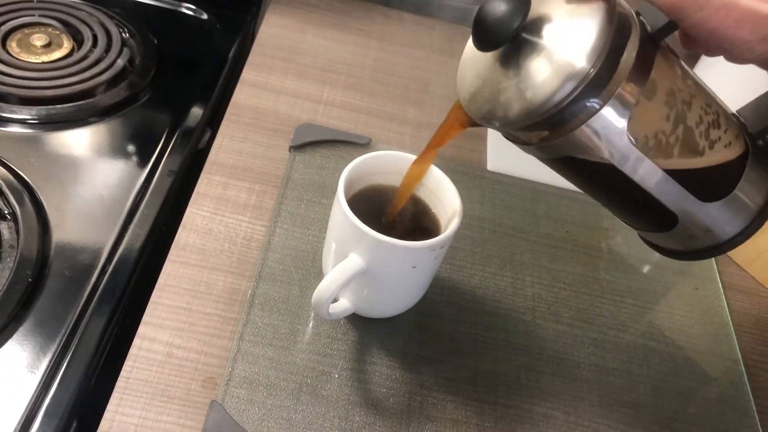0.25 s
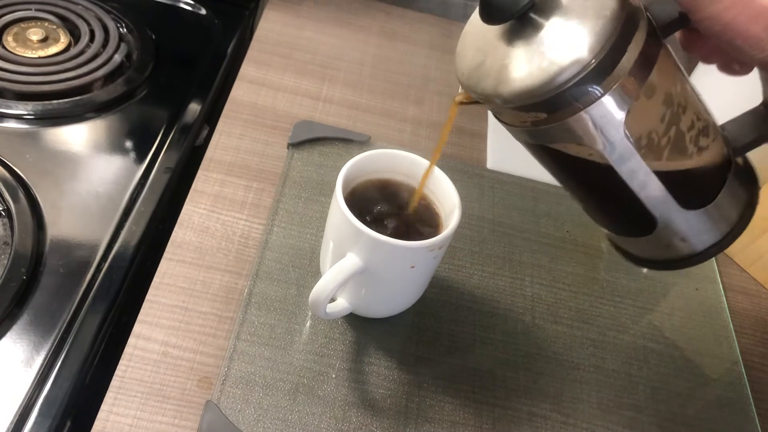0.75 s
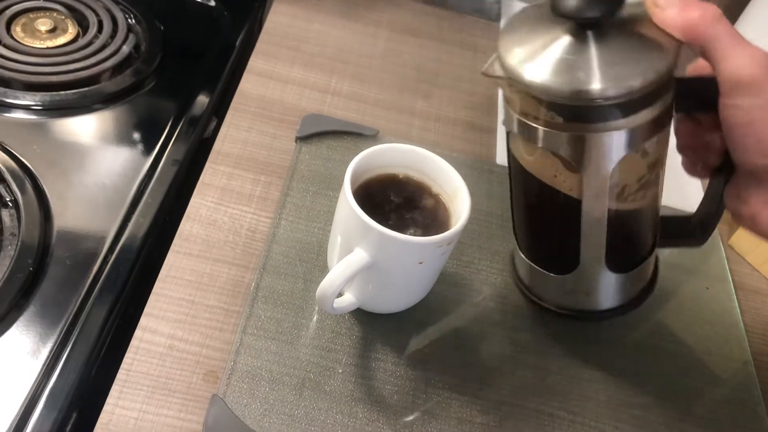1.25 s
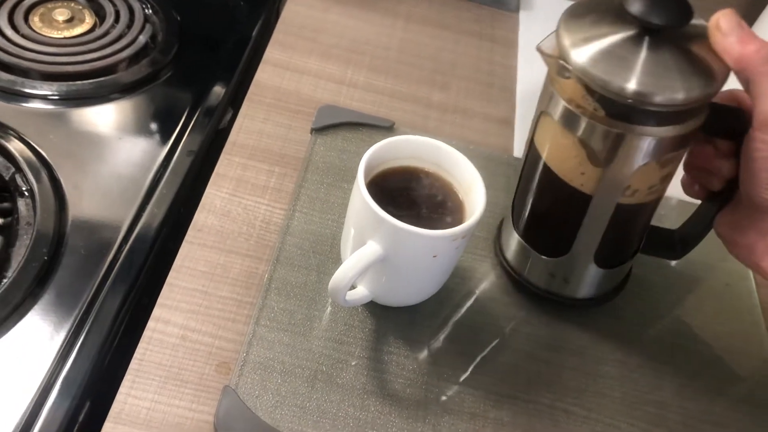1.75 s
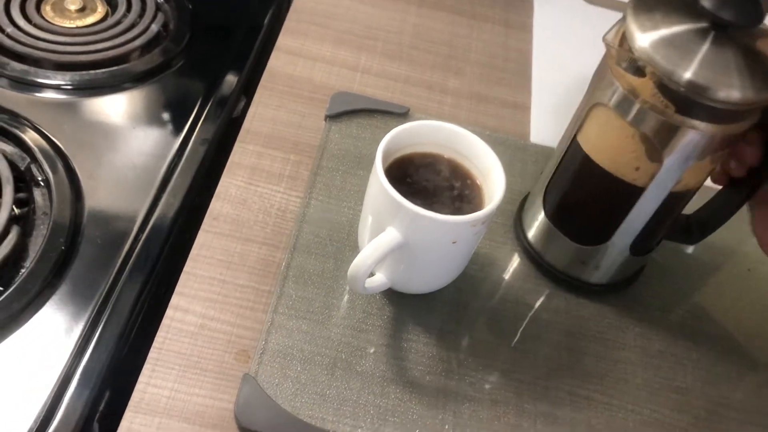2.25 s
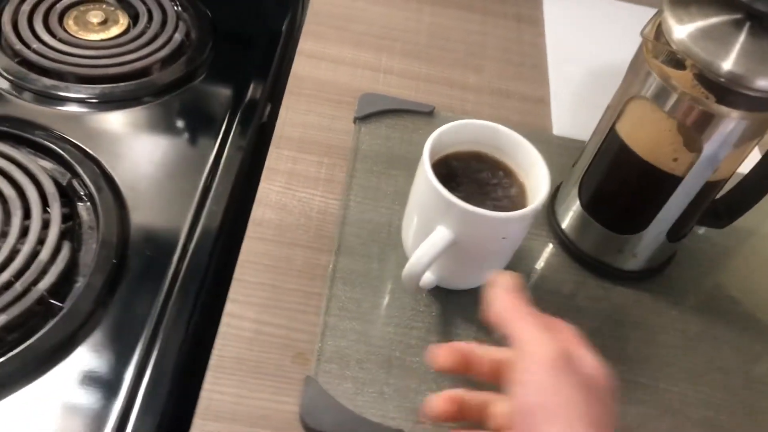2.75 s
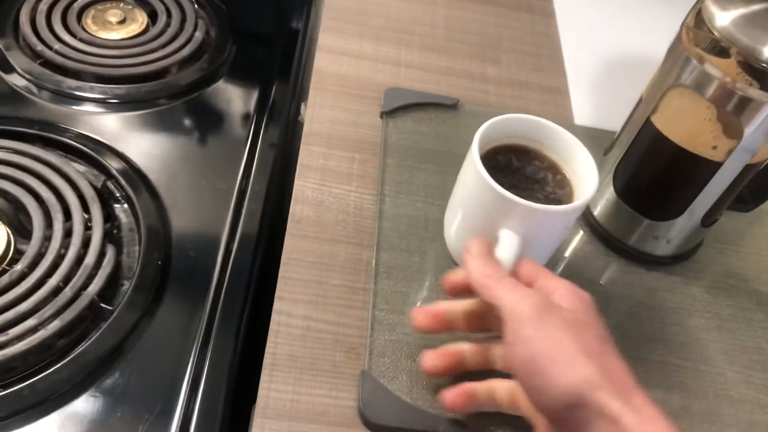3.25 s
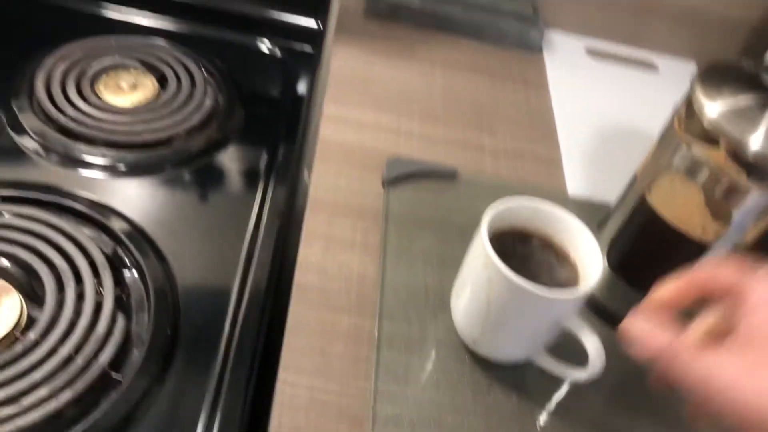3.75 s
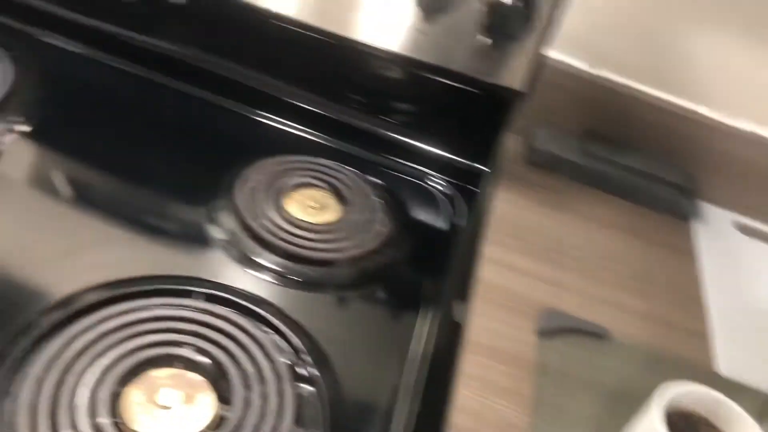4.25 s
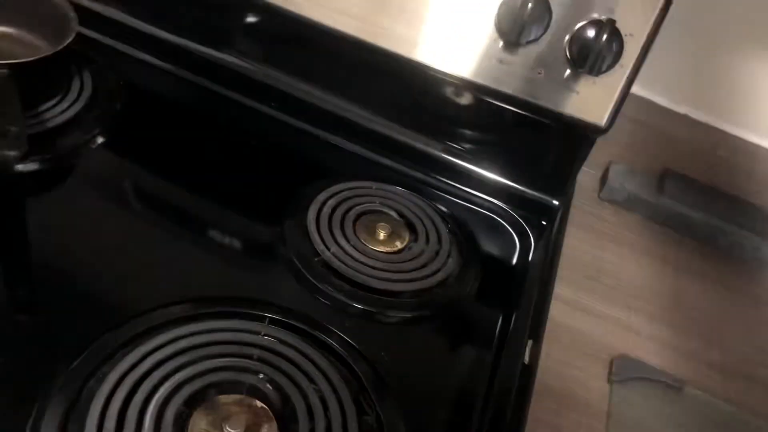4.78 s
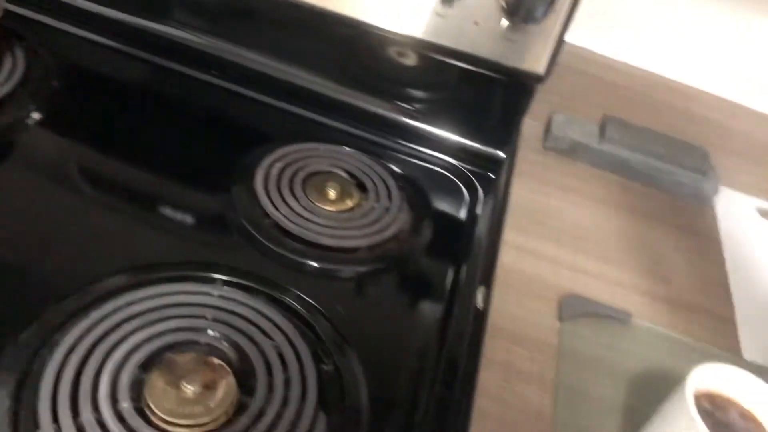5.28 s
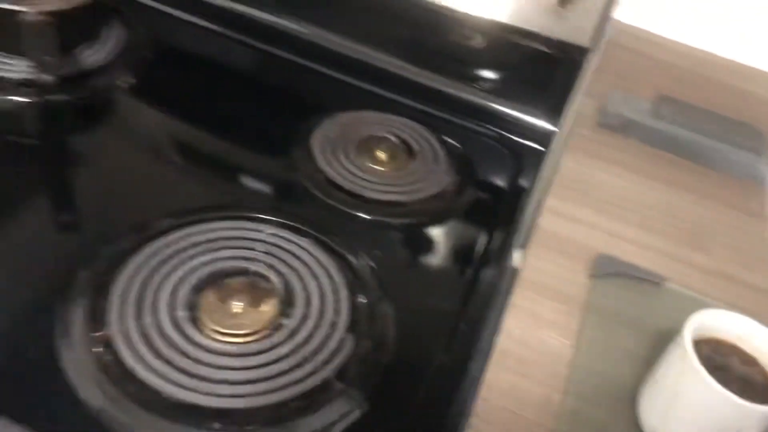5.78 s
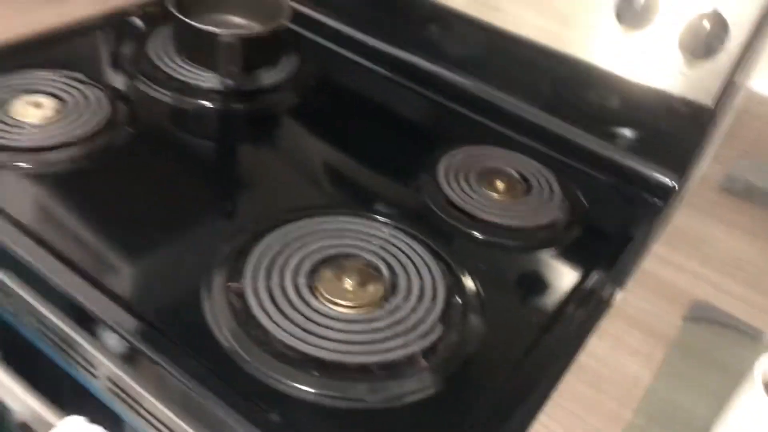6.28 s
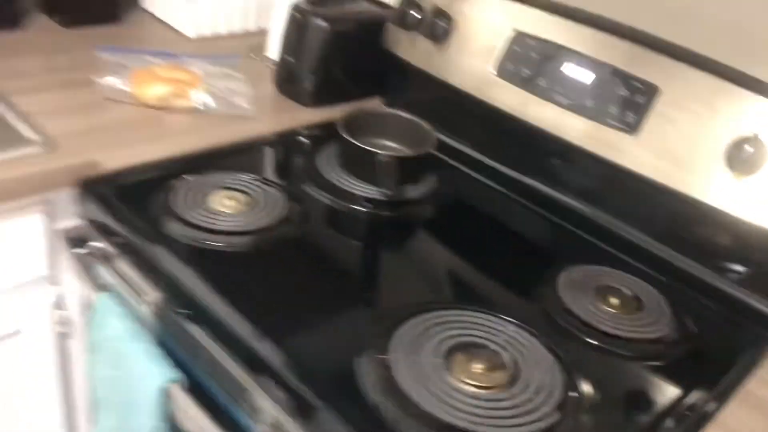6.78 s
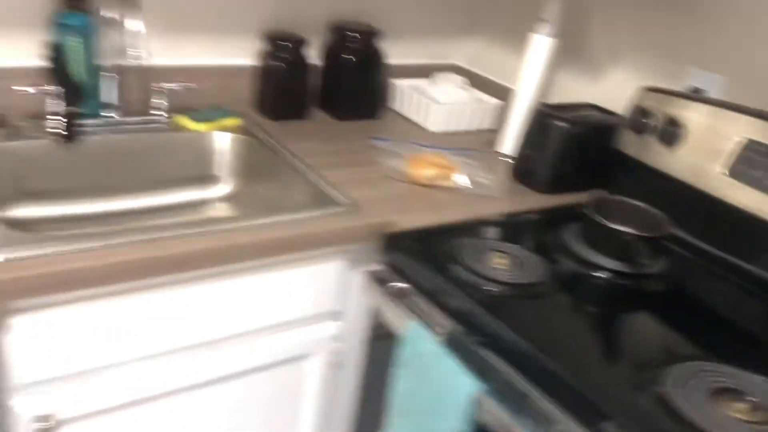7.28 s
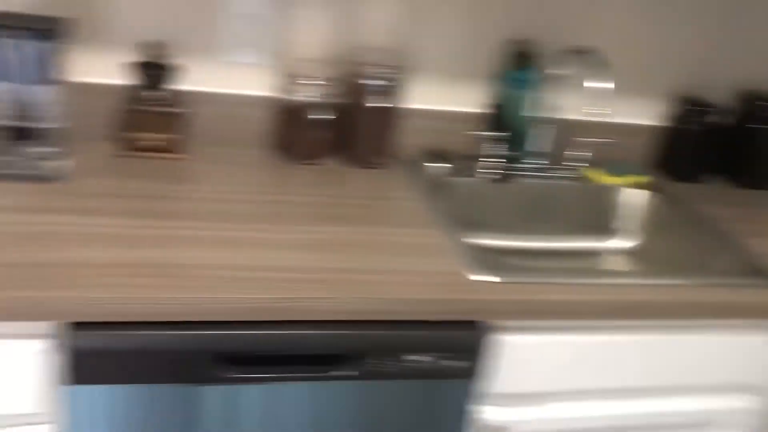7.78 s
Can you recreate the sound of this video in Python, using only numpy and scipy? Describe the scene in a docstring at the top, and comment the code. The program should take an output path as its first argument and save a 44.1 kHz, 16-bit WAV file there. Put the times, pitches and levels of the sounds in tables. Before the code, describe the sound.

In a small kitchen, the last of a coffee pour plops and spatters into a ceramic mug. The pot clunks down on a glass board and knocks a few more times, and the mug scrapes faintly as it is turned. A light switch snaps with a brief metallic ring. Soft steps, rustling clothes and a double knock like a cupboard door follow, all heard from close by over a low hum.

```python
"""Coffee plops and spatters into a ceramic mug: the last of a pour, its bubbles ringing the air inside.
The pot knocks down on a glass board, the mug grates as it is turned, and a light switch snaps off,
ringing a sheet metal hood. Someone steps away with a double knock and a rustle of clothes.
Faint drips, each one ringing bubble, and a low mains hum fill the small kitchen."""
import sys
import numpy as np
from scipy import signal
from scipy.fft import rfft, irfft
from scipy.io import wavfile

SR = 44100
rng = np.random.default_rng(int(sys.argv[2]) if len(sys.argv) > 2 else 0)


def wrap_up_sound(samples):
    """Save the sound to the file named by the first command line argument, as 16-bit audio."""
    columns = np.atleast_2d(samples).T
    # keep every value between -1 and 1, then stretch to whole-number steps
    tamed = np.clip(columns, -1, 1)
    steps = np.round(tamed * 32767).astype(np.int16)
    wavfile.write(sys.argv[1], SR, steps)


N = 354123
TIME_S = np.arange(N) / SR
CUTOFF_HZ = 16150
BLOW_SAMPLES = SR // 100  # a blow's level is its rms as if packed into this span
EDGES_HZ = np.geomspace(22, 17500, 30)
CENTRES_HZ, WIDTHS_HZ = np.sqrt(EDGES_HZ[1:] * EDGES_HZ[:-1]), np.diff(EDGES_HZ)
BANK = [signal.butter(2, pair, "band", fs=SR, output="sos") for pair in zip(EDGES_HZ, EDGES_HZ[1:])]

# Mains hum. Each row: frequency in Hz, rms level in dB.
HUM_PARTIALS = [(120, -62), (240, -79.5)]
# Kitchen reverberation. Each row: frequency in Hz, t60 in seconds.
ROOM_DECAY = [(80, 0.5), (250, 0.42), (700, 0.79), (1800, 0.52), (4800, 0.56), (9000, 0.17), (15000, 0.53)]

# Noise spectra. Each row: frequency in Hz, relative level in dB.
RUMBLE_SPECTRUM = [(25, -36), (55, -10), (90, -15.5), (150, -13.5), (230, -16), (300, -21.5), (420, -19),
                   (550, -24.5), (1300, -29.5), (2500, -35.5), (4600, -37.5), (9000, -44), (16000, -44)]
ROOM_SPECTRUM = [(60, -4), (300, 3), (1000, 0.5), (2500, -3.5), (6000, -0.5), (16000, -7)]
RUSTLE_SPECTRUM = [(150, 0), (500, 11.5), (1100, 4.5), (1800, 6.5), (3200, -0.5), (6200, -2), (11000, -9),
                   (13500, -13), (16000, -12.5)]
SLIDE_SPECTRUM = [(600, 2.5), (1500, 3), (2500, 9), (3200, 1), (4000, 8.5), (5500, 1.5), (7000, -1.5),
                  (16000, -14.5)]
TAP_SPECTRUM = [(200, -16), (900, -2.5), (2400, 4), (3500, -1.5), (5500, 0), (9000, -8), (16000, -21)]
STEP_SPECTRUM = [(40, -23), (90, 3.5), (250, 0), (600, -1.5), (1200, -9), (2500, -19), (6000, -32),
                 (16000, -49)]
DOOR_SPECTRUM = [(35, -36), (70, -5), (170, 4.5), (300, -8), (500, 2.5), (660, -12), (880, 9.5),
                 (1150, -17), (1600, 2), (2900, -17), (4600, -22), (16000, -64)]
SWITCH_SPECTRUM = [(100, -30), (250, -4.5), (420, -18.5), (620, -4), (1000, -6), (1400, -5), (2000, -1.5),
                   (2600, -12.5), (3500, -7.5), (6000, -15.5), (9500, -14.5), (12300, -22.5), (14500, -20),
                   (16500, -22)]
POT_SPECTRUM = [(50, -28), (90, -12.5), (150, -0.5), (205, 0), (255, -42), (330, 6), (450, -5.5),
                (700, -6.5), (1000, -2), (1600, -3), (2400, -13.5), (3800, -22.5), (6000, -33.5),
                (16000, -54.5)]
PLUNGE_SPECTRUM = [(200, -25), (420, 15.5), (700, -17), (1100, -28), (1700, -29.5), (3000, -5), (8000, -20)]

# Friction strokes. Each row: peak time in seconds, level in dB, rise and fall in seconds,
# tilt in dB per octave.
CLOTH_STROKES = [(3.93, -64.5, 0.1, 0.57, 1), (4.2, -69.5, 0.87, 0.56, 5), (4.93, -58, 0.29, 0.16, 1),
                 (5.08, -66, 0.1, 0.88, 0.5), (5.868, -56.5, 0.013, 0.23, 0), (6.38, -58, 0.22, .12, -1),
                 (6.63, -59, 0.71, .2, 3.5), (7.03, -63, 0.51, 0.89, -.5), (7.345, -59, 0.059, 0.49, 0.5),
                 (7.7, -47, 0.11, 0.23, 2.5), (7.88, -58, 0.28, 0.49, -1), (8.025, -55, 0.015, .1, 3)]
SLIDE_STROKES = [(2.32, -63.5, 0.31, .06, 3), (3.22, -62.5, 0.17, 0.19, -0.5),
                 (3.32, -62.5, 0.16, 0.21, -1.5)]

# Impacts. Each row: start in seconds, level in dB, tilt in dB per octave.
TAP_BLOWS = [(2.048, -62, 1.5), (2.18, -51, -0.5), (3.639, -53.5, -1), (3.652, -55.5, -1), (5.222, -63, 5),
             (5.382, -64, 5), (6.247, -57, 2), (6.298, -57, -4), (7.121, -52.5, 5.5), (7.259, -49.5, -4.5)]
STEP_BLOWS = [(3.262, -58, -9.5), (4.178, -54.5, -10), (4.391, -43.5, 2.5), (4.42, -47.5, 3),
              (5.61, -53, 0), (6.906, -50, -10.5), (6.968, -54, -8), (7.012, -63, -6.5), (7.129, -44, 1),
              (7.316, -47.5, 0), (7.903, -48, 2), (7.94, -51, 1.5)]
DOOR_BLOWS = [(6.393, -30, -0.2), (6.451, -32, -1.2)]
SWITCH_BLOWS = [(4.6856, -24.5, 1.5), (4.6893, -25.5, 1.5), (4.705, -28.5, -1.5)]
POT_BLOWS = [(1.4808, -22.5, 0.5), (1.4858, -23.5, 1), (1.497, -33, 3), (1.645, -26, -1),
             (1.662, -39.5, 0.5), (1.703, -31, -1.5), (2.1285, -30.5, -0.5), (2.136, -33.5, -4)]

# Modes. Each row: frequency in Hz, relative level in dB, t60 in seconds.
DOOR_PANEL_MODES = [(81, -5, .44), (484, -9, .5), (522, -1, .34), (727, -12, .3), (813, 0, .27),
                    (883, -3, .36), (958, -4, .32), (1292, -17, .4), (1427, -15, .33), (1588, -12, .33),
                    (1793, -19, .35), (2035, -24, .4)]
METAL_HOOD_MODES = [(269, -17, 1.1), (748, -10, 0.43), (985, 0, 0.18), (1233, -12, 0.37), (1324, -9, 0.45),
                    (1626, -19, 0.55), (1755, -11, 0.34), (2143, -14, 0.34), (2363, -15, 0.34),
                    (3418, -16, 0.32), (4570, -20, 0.45), (5739, -20, 0.27), (5943, -27, 0.62),
                    (6842, -13, 0.17)]  # around the switch
POT_BOARD_MODES = [(159, 4, .22), (205, 0, .2), (314, -3, .28), (403, 2, .25), (493, -7, .2),
                   (636, -6, .22), (696, -9, .26), (866, -1, .18), (968, -4, .16), (1064, 3, .13),
                   (1114, -3, .2), (1380, 3, .12), (1562, 5, .11), (2091, -7, .15), (2265, -7, .12),
                   (4715, -23, .25)]  # pot, board and counter
MUG_AIR_MODES = [(430, -22, 0.067), (1093, -19.5, 0.077), (1330, -32, 0.016), (1640, -50, 0.043),
                 (1780, -27, 0.047), (2395, -19.5, 0.028)]  # air column above the coffee

# Bubbles and droplets. Each row: start in seconds, relative level in dB, pitch in Hz.
FAR_DRIPS = [(2.7262, -42.5, 4270), (2.761, -45.5, 2540), (2.9785, -41, 7430), (3.9017, -44, 2110),
             (3.9352, -43, 5600), (4.41, -41, 6100), (4.458, -42, 3950), (4.888, -39, 1910),
             (5.461, -48, 1580), (5.636, -43.5, 1670), (5.649, -41, 1770), (5.696, -45, 1910),
             (6.6803, -45, 2550), (6.8251, -42, 2740)]
LOUD_DROPLETS = [(0.0034, -33, 13100), (0.2156, -38.5, 8400), (0.2493, -41, 14700), (0.3294, -36.5, 14800),
                 (0.7016, -35, 7000), (0.756, -37.5, 5500), (0.7912, -36.5, 10200), (0.8235, -21, 4160),
                 (0.8637, -41, 4330), (0.8935, -23.5, 10100), (0.9354, -40.5, 12300), (1.0503, -44, 13600),
                 (1.066, -39, 12400)]
LARGE_PLOPS = [(0.0034, -31.5, 1470), (0.2565, -31, 1680), (0.2618, -34.5, 1780), (0.3494, -29.5, 1730),
               (0.5753, -33.5, 2350), (0.6087, -25, 1500), (0.6806, -31, 2230), (0.7293, -25, 1520),
               (0.762, -22.5, 2180), (0.7973, -24, 1580), (0.8235, -19.5, 1360)]  # air pockets closing

# Level curves. Each row: time in seconds, level in dB.
FROTH_CURVE = [(0, -83), (.3, -61), (.45, -73.5), (.62, -64.5), (.75, -61), (.95, -75), (1.1, -69),
               (1.65, -75), (2, -100)]
STREAM_CURVE = [(0, -50.5), (.1, -65.5), (.25, -59.5), (.38, -60.5), (.45, -71), (.58, -62), (.82, -46.5),
                (.9, -59), (1, -94)]  # loudest as the stream breaks into drops


def from_db(db):
    """Decibels to gain."""
    return 10 ** (np.asarray(db) / 20)


def unit(x):
    """Scale to energy 1."""
    return x / np.sqrt(np.sum(x ** 2) + 1e-30)


def per_band(points):
    """A table over frequency, read at the band centres."""
    hz, value = np.transpose(points)
    return np.interp(np.log(CENTRES_HZ), np.log(hz), value)


def curve_gain(curve):
    """Gain along a level curve, faded in and out around it."""
    s, db = np.transpose(curve)
    return from_db(np.interp(TIME_S, np.r_[s[0] - .25, s, s[-1] + .25], np.r_[-120, db, -120]))


def decay(t, t60_s):
    """Exponential decay."""
    return np.exp(-np.log(1000) * t / max(t60_s, 1e-4))


def add(track, start_s, sound):
    """Mix a sound into a track."""
    at = int(np.clip(round(start_s * SR), 0, N - 1))
    track[at:at + len(sound)] += sound[:N - at]


def band_noise(band_db, envelopes):
    """Third-octave noise bands, each under its own envelope; energy 1."""
    noises = (envelope * rng.standard_normal(len(envelope)) + 1e-18 for envelope in envelopes)
    bands = (unit(signal.sosfilt(sos, noise)) for sos, noise in zip(BANK, noises))
    gains = from_db(band_db) * np.sqrt(WIDTHS_HZ)
    return unit(sum(gain * band for gain, band in zip(gains, bands)))


def steady_noise(spectrum):
    """Coloured noise, rms 1."""
    return np.sqrt(N) * band_noise(per_band(spectrum), [np.ones(N)] * len(BANK))


def ring(x, hz, t60_s):
    """Resonator: a unit click starts a decaying sine of height 1."""
    radius, angle = decay(1 / SR, t60_s), 2 * np.pi * hz / SR
    return signal.lfilter([0, np.sin(angle)], [1, -2 * radius * np.cos(angle), radius ** 2], x + 1e-18)


def bubble(hz, cycles, rise):
    """A bubble rings, rising in pitch as it nears the surface."""
    t, life_s = TIME_S[:SR // 10], cycles / hz
    phase = 2 * np.pi * np.cumsum(hz * (1 + rise * np.minimum(t / life_s, 1))) / SR
    return np.sin(phase) * decay(t, life_s) * (1 - np.exp(-2 * hz * t))


def grains(per_s, low_hz, high_hz, cycles, spread_db, pitches=12):
    """Tiny pings of random time, size and pitch; rms 1."""
    sizes = from_db(spread_db * np.minimum(rng.exponential(1, N), 3)) * rng.choice([-1, 1], N)
    clicks = sizes * (rng.random(N) < per_s / SR)
    pitch_index = rng.integers(0, pitches, N)
    pitches_hz = np.geomspace(low_hz, high_hz, pitches)
    pings = sum(ring(clicks * (pitch_index == k), hz, cycles / hz) for k, hz in enumerate(pitches_hz))
    return np.sqrt(N) * unit(pings)


def scattered(end_s, per_s, db, hz, spread_db, spread_octaves):
    """Unevenly spaced events. Each row: start in seconds, level in dB, pitch in Hz."""
    jitter, size, pitch = rng.uniform(-1, 1, (100, 3)).T
    start_s = (np.arange(len(jitter)) + .5 + jitter / 2) / per_s
    rows = np.column_stack([start_s, db + spread_db * size, hz * 2 ** (spread_octaves * pitch)])
    return list(rows[start_s < end_s])


def friction(strokes, spectrum, range_db=20):
    """Noise strokes, each swelling and dying by range_db over its rise and fall times."""
    out, t = np.zeros(N), TIME_S[:2 * SR] - 1
    hz = np.linspace(0, SR / 2, SR + 1)
    for peak_s, db, rise_s, fall_s, tilt in strokes:
        gains = from_db(np.interp(hz, CENTRES_HZ, per_band(spectrum) + tilt * np.log2(CENTRES_HZ)))
        noise = np.sqrt(len(t)) * unit(irfft(gains * rfft(rng.standard_normal(len(t)))))
        envelope = from_db(db - range_db * np.maximum(-t / rise_s, t / fall_s))
        add(out, peak_s - 1, envelope * noise)
    return out


def cracks(blows, spectrum, t60_1khz_s, bass_hold, lag_cycles):
    """Each blow is a short crack of dense modes, later and longer in the bass."""
    out, envelopes = np.zeros(N), []
    for hz in CENTRES_HZ:
        age_s = TIME_S[:SR // 4] - min(lag_cycles / hz, .02)
        envelopes.append((age_s >= 0) * decay(np.abs(age_s), t60_1khz_s * (1000 / hz) ** bass_hold))
    for start_s, db, tilt in blows:
        band_db = per_band(spectrum) + tilt * np.log2(CENTRES_HZ / 1000)
        add(out, start_s, from_db(db) * np.sqrt(BLOW_SAMPLES) * band_noise(band_db, envelopes))
    return out


def body_ring(blows, modes, gain_db):
    """Each blow adds energy to a body's main modes, which swell over two cycles and ring on."""
    out, t = np.zeros(N), TIME_S[:2 * SR]
    first_s = blows[0][0]
    for hz, mode_db, t60_s in modes:
        energy = 0
        for start_s, db, tilt in blows:
            age_s = np.maximum(t + first_s - start_s, 0)
            strength = from_db(db + mode_db + tilt * np.log2(hz / 1000))
            energy += (strength * (1 - np.exp(-hz * age_s / 2)) * decay(age_s, t60_s)) ** 2
        add(out, first_s, np.sqrt(energy) * np.sin(2 * np.pi * (hz * t + rng.random())))
    return from_db(gain_db) * out


def background(rumble_db=-63.5):
    """An appliance hums at twice the mains rate over the room's rumble."""
    hum = sum(from_db(db) * np.sqrt(2) * np.sin(2 * np.pi * hz * TIME_S) for hz, db in HUM_PARTIALS)
    return hum + from_db(rumble_db) * steady_noise(RUMBLE_SPECTRUM)


def kitchen(x, build_s=0.0018):
    """Reflections build quickly, then each band dies at its own rate."""
    t = TIME_S[:SR]
    onset = 1 - np.exp(-(t / build_s) ** 2)
    envelopes = [onset * decay(t, t60_s) for t60_s in per_band(ROOM_DECAY)]
    return signal.fftconvolve(x, band_noise(per_band(ROOM_SPECTRUM), envelopes))[:N]


def drips(gain_db=-3):
    """Each drip leaves one briefly ringing bubble."""
    out = np.zeros(N)
    for start_s, db, hz in FAR_DRIPS:
        add(out, start_s, from_db(db + gain_db) * bubble(hz, cycles=55, rise=.07))
    return out


def clothes(gain_db=1):
    """Cloth rubs with each movement."""
    return from_db(gain_db) * friction(CLOTH_STROKES, RUSTLE_SPECTRUM)


def slides(grit=0.35):
    """Pot, then mug, grate on the board in small catches."""
    catches = np.abs(signal.hilbert(grains(per_s=90, low_hz=2360, high_hz=5600, cycles=84, spread_db=2)))
    return friction(SLIDE_STROKES, SLIDE_SPECTRUM) * np.sqrt(1 + grit * (catches ** 2 - 1))


def taps():
    """Fingers and crockery tap lightly."""
    return cracks(TAP_BLOWS, TAP_SPECTRUM, t60_1khz_s=0.04, bass_hold=0.063, lag_cycles=0.45)


def steps():
    """Steps and soft bumps thud."""
    return cracks(STEP_BLOWS, STEP_SPECTRUM, t60_1khz_s=0.063, bass_hold=0.073, lag_cycles=0.86)


def door_knock():
    """A double knock, as of a cupboard door."""
    return cracks(DOOR_BLOWS, DOOR_SPECTRUM, t60_1khz_s=0.028, bass_hold=0.25, lag_cycles=1.0)


def switch_snap():
    """The rocker tips over and snaps home."""
    return cracks(SWITCH_BLOWS, SWITCH_SPECTRUM, t60_1khz_s=0.11, bass_hold=0.28, lag_cycles=0.55)


def pot_landing():
    """The pot's base lands and rocks on the glass board."""
    return cracks(POT_BLOWS, POT_SPECTRUM, t60_1khz_s=0.043, bass_hold=0.051, lag_cycles=0.96)


def spatter(tick_db=-13, spray_db=-21, skirt_db_per_octave=12, pop_fade_db_per_s=0.5):
    """Droplets tick and throw spray; the froth pops and fizzes on after the stream stops."""
    fizz = grains(per_s=700, low_hz=6500, high_hz=16000, cycles=24, spread_db=5.5, pitches=24)
    highpass = signal.butter(3, 7000, "high", fs=SR, output="sos")
    out = curve_gain(FROTH_CURVE) * signal.sosfilt(highpass, fizz)
    t = TIME_S[:SR // 10]
    envelopes = [decay(t, .003) + from_db(spray_db) * decay(t, .03)] * len(BANK)
    pops = scattered(end_s=1.5, per_s=16, db=-50, hz=13500, spread_db=5.5, spread_octaves=0.27)
    pops = [(start_s, db - pop_fade_db_per_s * start_s, hz) for start_s, db, hz in pops]
    for start_s, db, hz in LOUD_DROPLETS + pops:
        tick = band_noise(-skirt_db_per_octave * np.abs(np.log2(CENTRES_HZ / hz)), envelopes)
        add(out, start_s, from_db(db + tick_db) * np.sqrt(BLOW_SAMPLES) * tick)
    return out


def pour(bubbles_db=-2, plunge_db=-10, echo_s=0.00451, echo_db=-7, cavity_db=-21):
    """Plops, small bubbles and the stream's churn bounce off the pot and ring the air in the mug."""
    bubbles = from_db(bubbles_db) * grains(per_s=340, low_hz=1360, high_hz=2480, cycles=26, spread_db=3)
    churn = from_db(plunge_db) * steady_noise(PLUNGE_SPECTRUM)
    coffee = curve_gain(STREAM_CURVE) * (bubbles + churn)
    small_plops = scattered(end_s=.56, per_s=9.9, db=-41, hz=1950, spread_db=5, spread_octaves=0.24)
    for start_s, db, hz in LARGE_PLOPS + small_plops:
        add(coffee, start_s, from_db(db) * bubble(hz, cycles=13, rise=0.066))
    echo = from_db(echo_db) * np.interp(TIME_S - echo_s, TIME_S, coffee, left=0)
    cavity = sum(from_db(db + cavity_db) * ring(coffee, hz, t60_s) for hz, db, t60_s in MUG_AIR_MODES)
    return coffee + echo + cavity


def scene():
    """Mono mix; far sources send more to the room than near ones."""
    sends = [(pour(), -13.5), (spatter(), -10.5), (pot_landing(), -12), (switch_snap(), -7.5),
             (door_knock(), -7.5), (steps(), -3), (taps(), -10), (drips(), 0)]
    direct = sum(sound for sound, _ in sends)
    to_room = sum(from_db(send_db) * sound for sound, send_db in sends)
    ringing = (body_ring(POT_BLOWS, POT_BOARD_MODES, gain_db=-12.5)
               + body_ring(SWITCH_BLOWS, METAL_HOOD_MODES, gain_db=-9.5)
               + body_ring(DOOR_BLOWS, DOOR_PANEL_MODES, gain_db=-4))
    return (direct + ringing + kitchen(to_room) + slides() + clothes() + background())[None]


def record(dry):
    """Steep low-pass."""
    return signal.sosfilt(signal.ellip(10, .2, 80, CUTOFF_HZ, fs=SR, output="sos"), dry)


dry = scene()
out = record(dry)
wrap_up_sound(out)
```